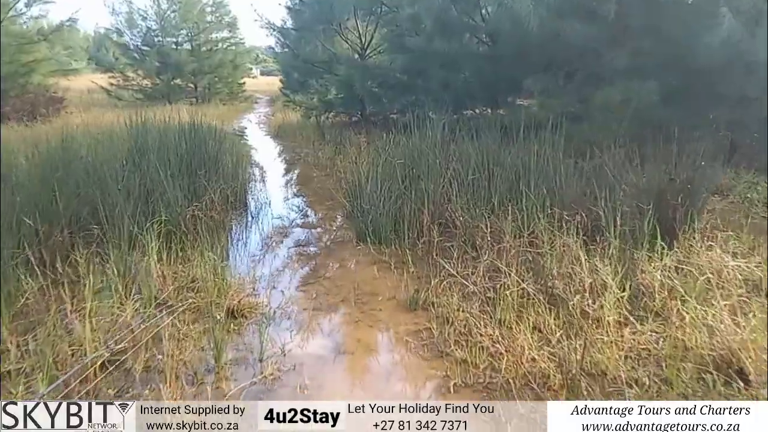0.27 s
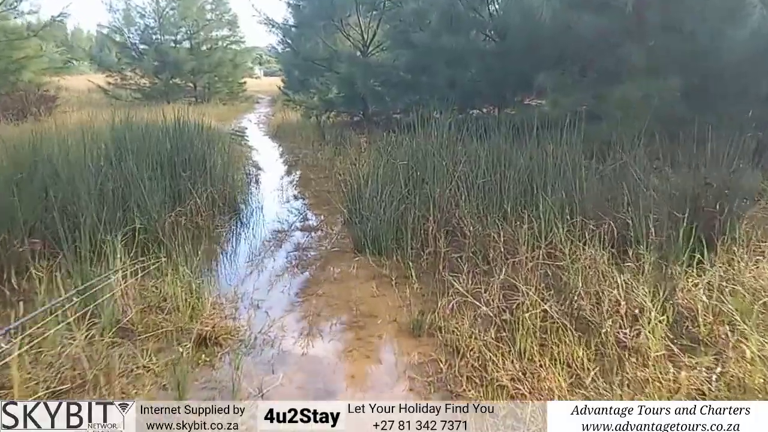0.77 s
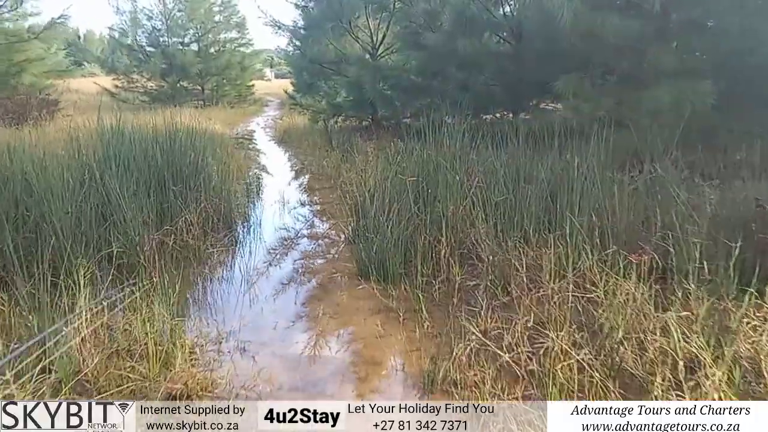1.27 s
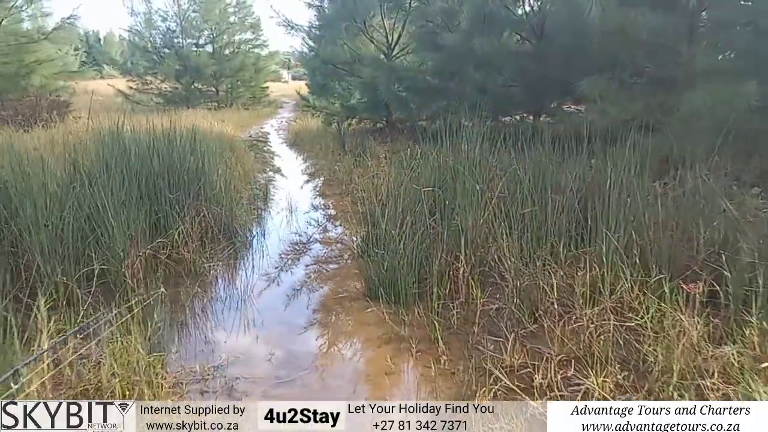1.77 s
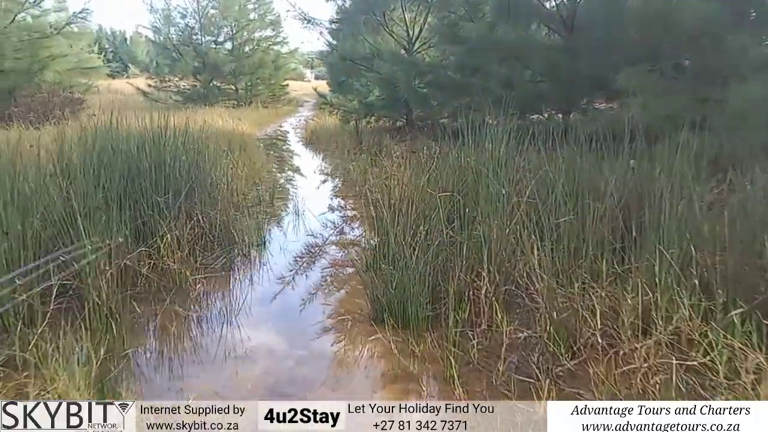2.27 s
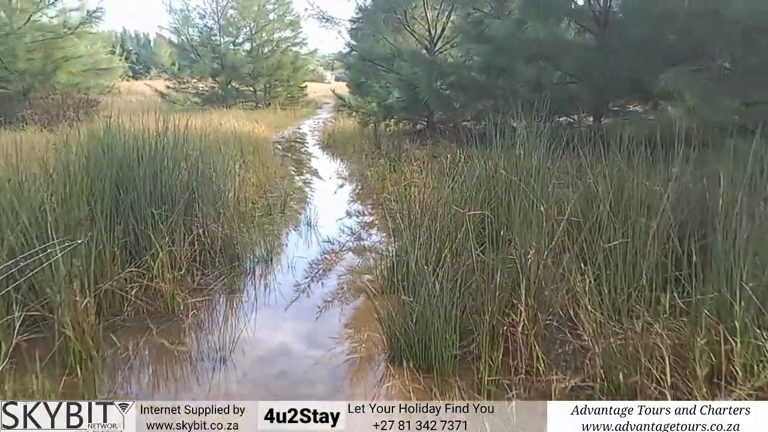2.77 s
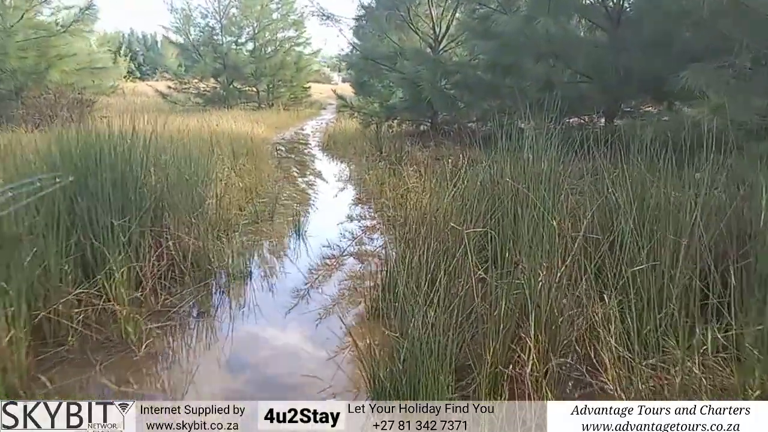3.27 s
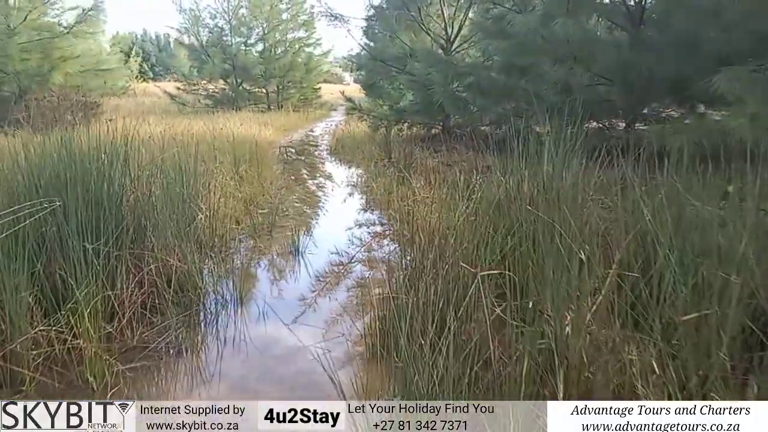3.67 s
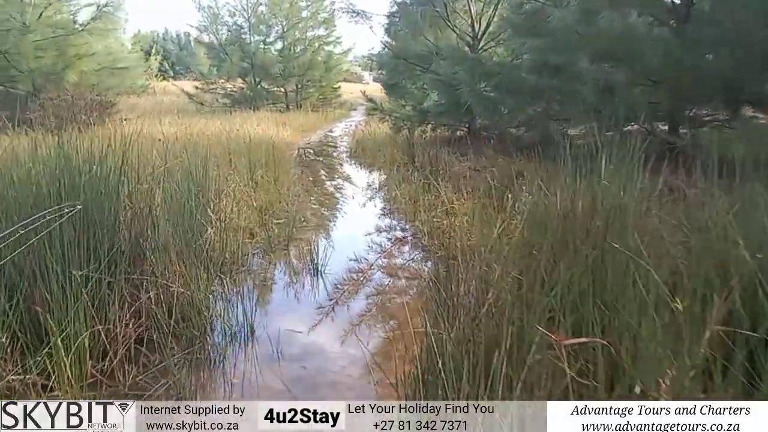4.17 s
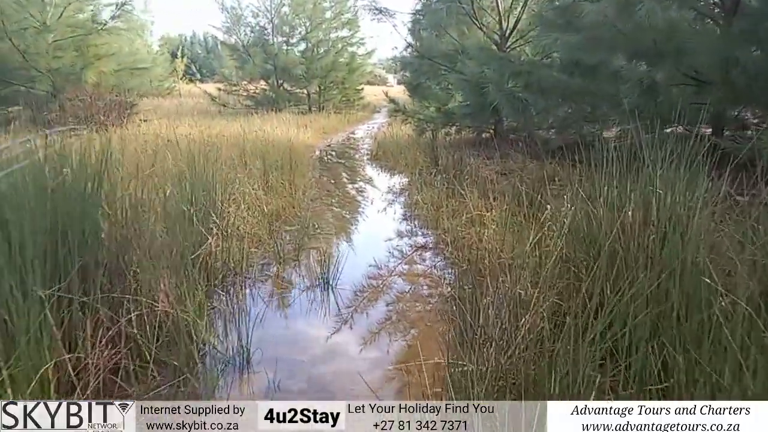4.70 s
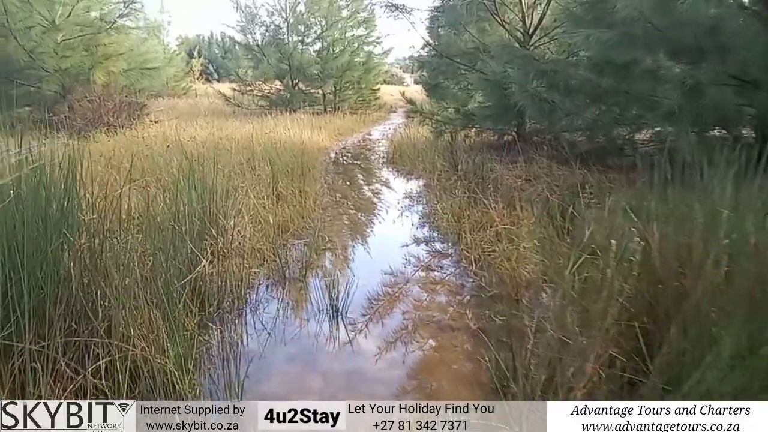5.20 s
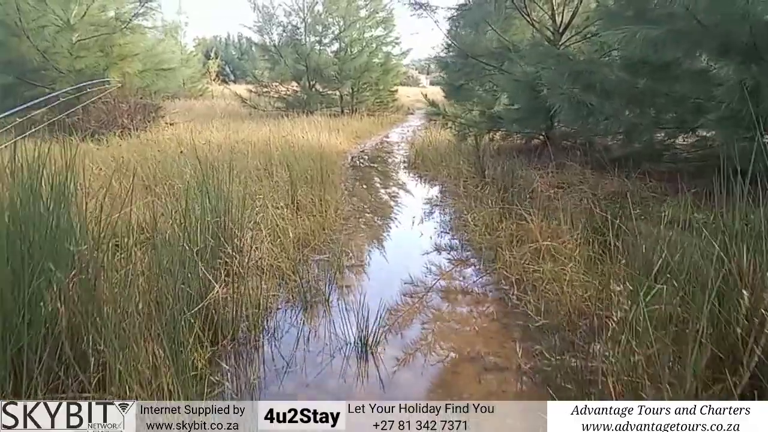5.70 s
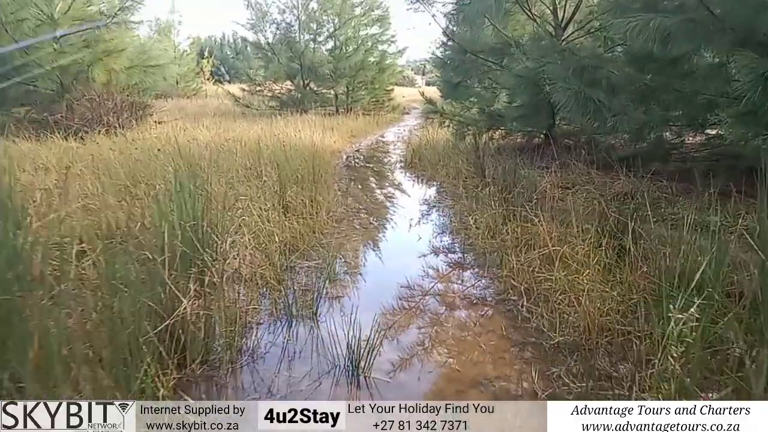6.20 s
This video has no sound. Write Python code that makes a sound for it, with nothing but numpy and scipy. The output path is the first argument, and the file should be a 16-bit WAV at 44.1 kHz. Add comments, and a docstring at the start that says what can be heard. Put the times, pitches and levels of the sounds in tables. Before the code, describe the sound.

Soft treads and brushing wet grass give way to boots wading through shallow water, with splashes, gurgles, plops and fizzing drops, growing louder and closer.

```python
"""Splashes lead: someone wades along a flooded grass path, each boot throwing up noise shaped like drops.
Trapped air plops and gurgles as short ringing tones, and the stirred puddle fizzes with many tiny bubbles.
Wet grass brushes and ticks against the legs as crackling noise. A few soft steps on wet ground come first,
as dull puffs of noise. Under it all lie a low rumble of air on the microphone and a faint hiss.
"""
import sys
import numpy as np
from scipy import signal
from scipy.fft import rfft, irfft, next_fast_len
from scipy.io import wavfile
from scipy.ndimage import map_coordinates

SR = 44100
rng = np.random.default_rng(int(sys.argv[2]) if len(sys.argv) > 2 else 0)


def dump_mix(stems):
    """Bounce the given channels to the path in sys.argv[1] as a 16-bit WAV at rate SR."""
    frames = np.atleast_2d(stems).T  # one column per channel
    limited = np.clip(frames, -1, 1)  # hard clip at full scale
    pcm = np.round(limited * 32767).astype(np.int16)
    wavfile.write(sys.argv[1], SR, pcm)


N = 284445  # length in samples

# Levels are set before the microphone's own colouring; t60 is the time to fade by 60 dB.
WADING_S = 2.55  # first step into water

# a swinging boot throws a sheet of water:
# (time [s], level at the crest before SHEET_DB [dB], rise [s], t60 [s], lowest strong pitch [Hz])
SPLASHES = [(0.058, -57.5, 0.027, 0.53, 1150), (.353, -60.5, 0.0087, 0.68, 1510),
            (1.965, -49, 0.024, 0.32, 2780), (2.593, -42, 0.03, 0.25, 2380),
            (2.731, -41, 0.0035, 0.069, 1900), (2.799, -44, 0.039, 0.15, 1480),
            (3.097, -39.5, 0.022, 0.23, 2090), (3.277, -34, 0.023, 0.13, 1310),
            (3.394, -40, 0.041, 0.47, 1750), (3.784, -31, 0.034, 0.23, 2270),
            (3.964, -40.5, 0.006, 0.36, 2020), (4.017, -38.5, 0.021, 0.22, 1200),
            (4.091, -35.5, 0.0066, 0.33, 930), (4.505, -32.5, 0.034, 0.19, 2300),
            (4.557, -33, .017, 0.076, 1210), (4.7, -34, 0.028, 0.27, 750),
            (5.211, -31.5, 0.025, 0.58, 1550), (5.446, -35.5, 0.026, 0.54, 750),
            (5.55, -39.5, 0.038, 0.18, 1830), (5.652, -35.5, 0.021, 0.24, 1780),
            (5.96, -32.5, 0.027, 0.49, 1710), (6.195, -37, 0.0043, 0.12, 1960),
            (6.418, -37, 0.029, .15, 1260)]
# a boot plunges in with a slap and thuds on the bed:
# (time [s], slap level at the crest before SHEET_DB [dB], rise [s], lowest strong pitch [Hz], thud level [dB])
PLUNGES = [(3.471, -39.5, 0.0022, 600, -43), (4.122, -26, .017, 750, -42.5), (4.734, -25, 0.0151, 870, -32),
           (5.502, -28, 0.025, 780, -31), (6.187, -23.5, 0.0013, 690, -28)]
SHEET_DB = 0.18  # added to every splash and slap
SLAP_T60_S = 0.044
THUD_RISE_S, THUD_T60_S = 0.0017, 0.091

# the largest air pockets ring out:
# (time [s], peak level before the shake [dB], pitch [Hz], t60 [s], pitch glide over the t60 [octaves])
AIR_POCKETS = [(.088, -49, 1477, 0.029, 1), (2.033, -52, 687, 0.077, 2), (2.697, -39, 2440, 0.03, 3.5),
               (2.725, -26, 1870, 0.01, 1), (2.83, -43, 667, 0.068, 1.5), (2.806, -34.5, 2940, 0.024, 1.5),
               (3.305, -21, 2210, 0.0036, 1.5), (3.337, -39.5, 290, 0.043, 0),
               (3.357, -36.5, 1850, 0.076, 2.5), (3.406, -39, 612, 0.13, 6), (3.475, -31, 554, 0.059, 2.5),
               (3.504, -30.5, 670, 0.033, 1.4), (3.574, -37.5, 728, 0.11, 0.1),
               (3.829, -30, 1370, 0.035, 2), (4.024, -28.5, 1155, 0.027, 0.5),
               (4.065, -32, 1170, 0.048, 0.2), (4.136, -19.5, 1314, 0.02, 0.5),
               (4.216, -33, 763, 0.056, 2.5), (4.739, -27, 433, 0.026, -2.5), (4.744, -27.5, 166, 0.086, 2),
               (5.011, -34.5, 722, 0.063, .5), (5.164, -28, 736, 0.034, 0.1),
               (5.238, -19.5, 1080, 0.018, 0.7), (5.485, -17, 918, 0.034, 2.06),
               (5.5, -15.5, 400, 0.025, 4.5), (5.51, -11.5, 336.5, 0.014, 1), (5.518, -28, 229, 0.18, 0),
               (5.991, -22, 2380, 0.0095, -0.5), (6.03, -22, 614, .05, -0.5), (6.187, -23, 198, 0.11, 0),
               (6.447, -21, 2160, 0.039, -0.5)]
DEEP_HZ = 320  # pockets at or below this pitch never glide upward

# water closes behind a leg and gurgles:
# (time [s], level before GURGLE_DB [dB], hold [s], bubble pitch at the end of the hold [Hz])
GURGLES = [(2.658, -64, 0.1, 910), (3.402, -49.5, 0.14, 797), (4.03, -47, 0.077, 970),
           (4.199, -44.5, 0.029, 950), (4.538, -51.5, 0.21, 764), (4.975, -46, 0.55, 854),
           (5.643, -43, 0.21, 843), (5.988, -45.5, 0.18, 730)]
GURGLE_DB, GURGLE_RISE_S, GURGLE_T60_S = -2, 0.016, 0.54
# colour of the gurgle: (frequency [Hz], level [dB])
GURGLE_COLOUR = [(120, -47), (300, -0.5), (550, -4), (850, -1), (1400, -1.5), (2500, -1.5), (6000, -46)]
# colour of the fizzing froth: (frequency [Hz], level [dB])
FIZZ_COLOUR = [(400, -4), (1000, -21), (1700, -24), (3000, 22.5), (5000, 21.5), (8000, 29), (16000, -4)]
FIZZ_DB, FIZZ_RISE_S, FIZZ_T60_S = -15.5, 0.053, 0.28  # level relative to the splash in the table
DRIP_DB = -6.5  # drops falling back in, relative to the froth

# a leg sweeps through wet stems: (time [s], level at the crest before SWISH_DB [dB], rise [s], t60 [s])
SWISHES = [(0.0, -58.5, 0.0036, 0.33), (.09, -63, 0.08, 1.6), (.59, -66, 0.023, 0.32),
           (.72, -60, 0.01, 1.02), (.88, -62.5, 0.56, 2.2), (1.32, -59.5, 0.0083, 0.53),
           (1.72, -53.5, 0.24, 0.16), (2.03, -61, 0.15, 0.37), (2.43, -63.5, 0.011, 0.33)]
# fine spray falling on the stems: (time [s], level before PATTER_DB [dB])
SPRAY = [(2.55, -85), (2.74, -55.5), (2.92, -80), (3.15, -85), (3.32, -54), (3.77, -61.5), (3.99, -53),
         (4.18, -62), (4.43, -56), (4.61, -50), (4.98, -60.5), (5.25, -54), (5.4, -51), (5.59, -45),
         (5.74, -49.5), (6.18, -51), (6.29, -48), (6.45, -54)]
SWISH_DB, PATTER_DB = 2.5, 5
FLUTTER_DB, FLUTTER_PER_S = 2, 50  # stems flutter as they pass: depth, changes a second
# colour of the swishing blades: (frequency [Hz], level [dB])
BLADE_COLOUR = [(300, 9), (1500, -21.5), (3500, -1), (6000, -2.5), (8500, -5.5), (12000, -4), (15500, 0)]
# colour of spray on the stems: (frequency [Hz], level [dB])
STEM_COLOUR = [(300, -18), (1500, 7.5), (3500, 6.5), (6000, 0.5), (8500, -2), (15500, 1)]

# the nearest drops and stems snapping: (time [s], peak level before TICK_DB [dB], pitch [Hz])
TICKS = [(.018, -37.5, 4320), (0.313, -45.5, 9100), (1.99, -33, 5800), (2.168, -40.5, 7660),
         (2.437, -41, 8900), (2.605, -26, 5270), (2.684, -30, 4630), (2.744, -25.5, 3440),
         (2.794, -32.5, 3880), (2.853, -29.5, 7950), (3.279, -25, 5700), (4.074, -25, 7500),
         (4.11, -19, 7100), (4.517, -23, 11500), (4.746, -19, 8100), (4.403, -43, 9000),
         (4.93, -32.5, 8200), (5.496, -22.5, 9100), (5.674, -17.5, 4600), (6.188, -20, 6200),
         (6.241, -21.5, 3330), (6.382, -27.5, 6600)]
TICK_DB = 2.0

# soft treads on sodden turf: (time [s], level at the crest [dB])
TREADS = [(0.261, -60.5), (.378, -53.5), (0.665, -54), (0.744, -59), (1.019, -60.5), (1.499, -45),
          (1.61, -48.5), (1.918, -51)]
TREAD_RISE_S, TREAD_T60_S = 0.0098, 0.14
# colour of treads and thuds: (frequency [Hz], level [dB])
TURF_COLOUR = [(100, 1), (300, 8), (650, 0.5), (1200, -10.5), (3000, -34), (8000, -57)]

# air on the microphone: (time [s], rumble level before eddies and wobble [dB])
RUMBLE = [(0.0, -57), (1.26, -52.5), (1.92, -57), (2.01, -49.5), (2.37, -58), (3.45, -50.5), (3.79, -57),
          (4.62, -45), (4.65, -54), (5.73, -44.5), (5.8, -54), (6.0, -46.5), (6.31, -55), (6.45, -44)]
RUMBLE_WOBBLE_DB, RUMBLE_WOBBLE_PER_S = 1.86, 16
HISS_DB = -75.0
# colour of the rumble: (frequency [Hz], level [dB])
RUMBLE_COLOUR = [(15, -69), (35, -65), (60, -3.5), (110, -1), (160, -12), (250, -12.5), (400, -29.5),
                 (800, -38), (2000, -45.5), (6000, -61)]
# colour of the eddies at each port: (frequency [Hz], level [dB])
EDDY_COLOUR = [(15, -9), (35, -2), (58, 24.5), (90, 2), (140, 3), (300, -42), (1000, -53)]
# colour of the steady hiss: (frequency [Hz], level [dB])
HISS_COLOUR = [(100, -5), (1000, 2), (2200, -5.5), (5500, 9.5), (8500, 1), (16000, -9)]

# how alike left and right are in spread-out sound: (frequency [Hz], likeness [0-1])
ALIKE = [(60, 1), (200, 0.89), (800, 0.22), (1500, 0.53), (3000, 0.3), (6500, 0), (15000, 0)]
# the microphone's left-right tilt: (frequency [Hz], left minus right [dB])
TILT = [(60, 0), (300, -2), (700, 2.5), (1300, 1), (2400, -4), (4400, -3.5), (6800, -10.5), (9000, 3),
        (12000, -7), (15000, -7)]
# resonances of the microphone ports: (centre [Hz], width [Hz], boost [dB])
PORTS = [(6787, 690, 7.5), (11730, 1800, 5)]
TOP_HZ = 15700  # the sound ends steeply here


def splashes():
    """Each thrown sheet of water swells in drops and small bubbles, then fades; a plunge is a brief slap."""
    out, t = np.zeros((2, N)), np.arange(SR // 3) / SR
    droplets = crackle(rate=900, size_db=14, wash_db=-3)
    froth = both_ports(lambda: swarm(count=3500, hz=2700, octaves=1, cycles=18, glide=.3, size_db=13, size=420))
    # extra water past the end, so that the last sheets are full length
    water = np.pad(droplets + amp(-2) * froth, ((0, 0), (0, len(t))), mode="wrap")
    slaps = [(s, db, rise, SLAP_T60_S, hz) for s, db, rise, hz, _ in PLUNGES]
    for s, db, rise, t60, hz in list(SPLASHES) + slaps:

        def colour(f):
            # the largest pockets set the low edge; spray keeps a flat treble above the slope
            low_edge = (f / hz) ** 3 / (1 + (f / hz) ** 3)
            slope = (1 + (f / (1.37 * hz)) ** 2) ** -.8
            return low_edge * (slope + amp(-12.5))

        start = round(s * SR)
        sheet = spread(water[:, start:start + len(t)], colour)
        add(out, s, amp(db + SHEET_DB) * swell(t, rise, t60) * sheet)
    return out


def plops():
    """Single large air pockets close under the boot; the churning water shakes their ring."""
    out, t = np.zeros(N), np.arange(SR // 5) / SR
    for s, db, hz, t60, glide in AIR_POCKETS:
        # the boot holds the deepest pockets down, so their pitch can only sink
        tone = ring(t, hz, t60, glide if hz > DEEP_HZ else min(glide, 0))
        tone = tone / np.abs(tone).max()
        # higher pockets shake faster
        shake = unit(filtered(rng.standard_normal(len(t)), lambda f: 1 / (1 + (f / (60 + hz / 12)) ** 4)))
        add(out, s, amp(db) * tone * (1 + .35 * shake))
    return out


def stirred_water():
    """Large bubbles gurgle behind each leg; after each splash the puddle fizzes and drops plink back in."""
    gurgle_level = swells([(s, db, GURGLE_RISE_S, GURGLE_T60_S, hold) for s, db, hold, _ in GURGLES])
    hold_ends = [s + hold for s, _, hold, _ in GURGLES]
    pitch = np.interp(np.arange(N) / SR, hold_ends, [hz for *_, hz in GURGLES])
    large = swarm(count=1500, hz=pitch, octaves=.52, cycles=29, glide=.25, size_db=9, size=1800)
    gurgle = unit(filtered(large, shape(GURGLE_COLOUR)))
    gurgle = gurgle + amp(-9) * spread(noise(), shape(GURGLE_COLOUR))

    fizz_level = swells([(s, db + FIZZ_DB, FIZZ_RISE_S, FIZZ_T60_S) for s, db, *_ in SPLASHES if s > WADING_S])
    small = both_ports(lambda: swarm(count=1300, hz=2800, octaves=.65, cycles=26, glide=.25, size_db=16, size=700))
    froth = spread(small, shape(FIZZ_COLOUR)) + amp(-5) * spread(noise(), shape(FIZZ_COLOUR))
    drips = swarm(count=300, hz=2200, octaves=.75, cycles=50, glide=.3, size_db=9, size=1500)
    return amp(GURGLE_DB) * gurgle_level * gurgle + fizz_level * (froth + amp(DRIP_DB) * drips)


def grass():
    """Wet stems swish along the legs; once in the water, fine spray patters on them too."""
    wading = np.arange(N) / SR > WADING_S
    scraping = crackle(rate=300, size_db=20, wash_db=5)
    drops = crackle(rate=450, size_db=26, wash_db=2)
    swish = amp(SWISH_DB) * swells(SWISHES) * spread(scraping, shape(BLADE_COLOUR))
    patter = amp(PATTER_DB) * wading * curve(SPRAY) * spread(drops, shape(STEM_COLOUR))
    return (swish + patter) * amp(FLUTTER_DB * wobble(FLUTTER_PER_S))


def ticks(octaves=0.63):
    """Single drops and stems snap close by: very short noise bursts around one pitch."""
    out, t = np.zeros((2, N)), np.arange(SR // 50) / SR
    for s, db, hz in TICKS:
        burst = noise(len(t)) * np.exp(-np.log(1000) * t / .007)  # t60 of 7 ms
        snap = spread(burst, lambda f: np.exp(-(np.log2((f + 1) / hz) / octaves) ** 2 / 2))
        add(out, s, amp(db + TICK_DB) * snap / np.abs(snap).max())
    return out


def treads():
    """A boot presses into soft ground with a dull puff; under water it meets the bed with a shorter thud."""
    out, t = np.zeros((2, N)), np.arange(SR // 3) / SR
    puffs = [(s, db, TREAD_RISE_S, TREAD_T60_S) for s, db in TREADS]
    # the thud starts halfway through the rise of the slap
    puffs += [(s + rise / 2, db, THUD_RISE_S, THUD_T60_S) for s, _, rise, _, db in PLUNGES]
    for s, db, rise, t60 in puffs:
        add(out, s, amp(db) * swell(t, rise, t60) * spread(noise(len(t)), shape(TURF_COLOUR)))
    return out


def air():
    """Moving air rumbles on the microphone, eddying at each port, over a faint steady hiss."""
    eddies = unit(filtered(noise(), shape(EDDY_COLOUR)))
    rumble = spread(noise(), shape(RUMBLE_COLOUR)) + amp(-6) * eddies
    unsteady = amp(RUMBLE_WOBBLE_DB * wobble(RUMBLE_WOBBLE_PER_S))
    hiss = amp(HISS_DB) * spread(noise(), shape(HISS_COLOUR))
    return unsteady * curve(RUMBLE) * rumble + hiss


def ring(t, hz, t60, glide):
    """A bubble swells within a cycle or two and dies away while its pitch glides, upward if glide is positive."""
    pitch = hz * 2 ** (glide * np.minimum(t / t60, 1))
    onset = 1 - np.exp(-(t * (hz / 3 + 400)) ** 3)
    tone = np.sin(2 * np.pi * np.cumsum(pitch, axis=-1) / SR)
    return tone * onset * np.exp(-np.log(1000) * t / t60)


def swarm(count, hz, octaves, cycles, glide, size_db, size):
    """Bubbles of random pitch, life and strength from the first step into water; hz may vary in time; rms 1."""
    first = int(WADING_S * SR)
    start, strength = rng.random((count, 2)).T
    start = (first + start * (N - first)).astype(int)[:, None]
    pitch, life, rise = rng.standard_normal((count, 3), dtype=np.float32).T[:, :, None]
    centre = np.broadcast_to(np.float32(hz), N)[start]
    f = np.clip(centre * 2 ** (octaves * pitch), 200, SR / 3)
    t = np.arange(size, dtype=np.float32) / SR
    t60 = cycles * 2 ** (life / 2) / f
    grains = ring(t, f, t60, glide * (1 + rise)) * (1 - t / t[-1])
    grains = grains * amp(size_db * strength ** 2)[:, None]
    # sum every bubble at its own place in time
    places = (start + np.arange(size)).ravel()
    return unit(np.bincount(places, grains.ravel(), N)[:N])


def both_ports(bubbles):
    """Bubbles burst all round the feet: a separate swarm for each port."""
    return np.array([bubbles(), bubbles()])


def crackle(rate, size_db, wash_db):
    """Tiny noise bursts, rate a second, timed alike at both ports, on a steady wash of finer spray."""
    chance, strength = rng.random((2, N))
    bursts = (chance < rate / SR) * amp(size_db * strength ** 4)
    decay = np.exp(-np.arange(SR // 400) / (SR / 2500))
    burst_level = unit(signal.fftconvolve(bursts, decay)[:N])
    return unit(noise() * (burst_level + amp(wash_db)))


def noise(n=N):
    """Two channels of white noise."""
    return rng.standard_normal((2, n))


def wobble(rate):
    """A smooth random curve through rate random points a second."""
    return map_coordinates(rng.standard_normal(int(N * rate / SR) + 4), [np.arange(N) * rate / SR])


def swell(t, rise, t60, hold=0):
    """A straight rise to the crest, a hold, then an exponential fall."""
    return np.clip(t / rise, 0, 1) * np.exp(-np.log(1000) * np.maximum(t - rise - hold, 0) / t60)


def swells(rows):
    """One gain per sample from (time, dB, rise, t60, hold) rows; overlaps add in power."""
    power, t = np.zeros(N), np.arange(SR) / SR
    for s, db, *envelope in rows:
        add(power, s, (amp(db) * swell(t, *envelope)) ** 2)
    return np.sqrt(power)


def curve(rows):
    """One gain per sample from (time, dB) points."""
    s, db = np.transpose(rows)
    return amp(np.interp(np.arange(N) / SR, s, db))


def amp(db):
    """Decibels to gain."""
    return 10 ** (np.asarray(db) / 20)


def unit(x):
    """Scale to an rms (average strength) of 1."""
    return x / np.sqrt(np.mean(x ** 2) + 1e-20)


def along(points, hz):
    """Read (frequency, value) points on a log frequency axis."""
    f, v = np.transpose(points)
    return np.interp(np.log(hz + 1), np.log(f), v)


def shape(points):
    """A colour table as a gain for each frequency."""
    return lambda hz: amp(along(points, hz))


def filtered(x, response):
    """Change the strength of each frequency in x by the response."""
    n = x.shape[-1]
    m = next_fast_len(n + 2048)  # spare room for the filter's tail
    return irfft(rfft(x, m) * response(np.fft.rfftfreq(m, 1 / SR)), m)[..., :n]


def spread(pair, colour):
    """Mix two signals into coloured stereo of rms 1, alike in the bass and wider above."""
    def mid_side_gain(hz):
        turn = np.arccos(np.clip(along(ALIKE, hz), -1, 1)) / 2
        return colour(hz) * np.array([np.cos(turn), np.sin(turn)])

    mid, side = filtered(pair, mid_side_gain)
    return unit(np.array([mid + side, mid - side]))


def add(out, s, x):
    """Mix x into out from time s on."""
    i = max(0, round(s * SR))
    part = out[..., i:i + x.shape[-1]]
    part += x[..., :part.shape[-1]]


def scene():
    """Open ground gives no echo: everything arrives dry."""
    return splashes() + plops() + stirred_water() + grass() + ticks() + treads() + air()


def record(dry):
    """The ports ring in the treble, left and right differ in colour, and the top of the band ends steeply."""
    def port_gain(hz):
        boost = sum(db / (1 + (2 * (hz - centre) / width) ** 2) for centre, width, db in PORTS)
        tilt = np.array([[.5], [-.5]]) * along(TILT, hz)  # half to each side
        return amp(boost + tilt)

    heard = filtered(dry, port_gain)
    return filtered(heard, lambda hz: 1 / np.sqrt(1 + (hz / TOP_HZ) ** 200))


dry = scene()
out = record(dry)
dump_mix(out)
```